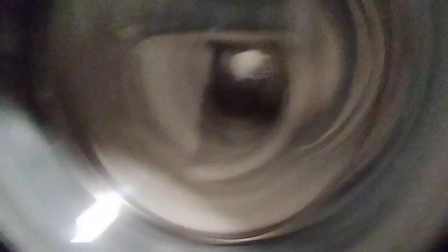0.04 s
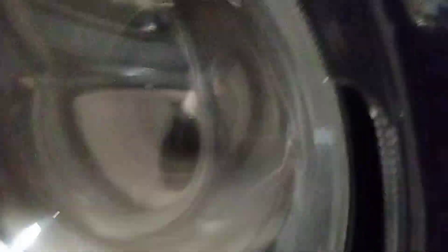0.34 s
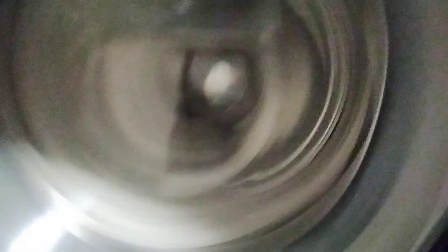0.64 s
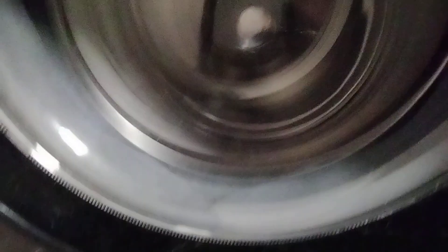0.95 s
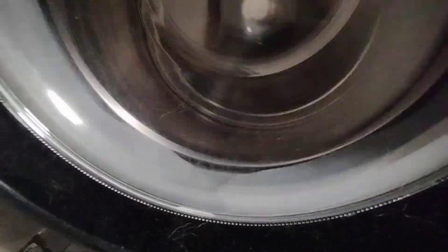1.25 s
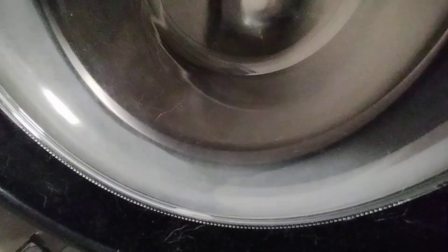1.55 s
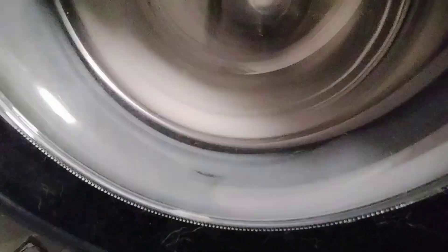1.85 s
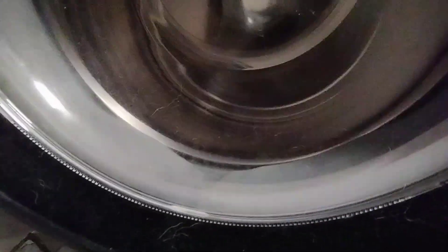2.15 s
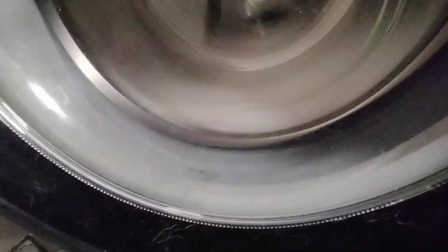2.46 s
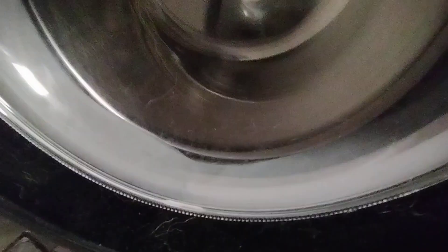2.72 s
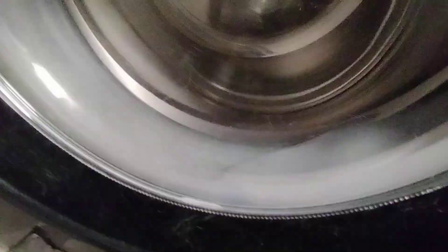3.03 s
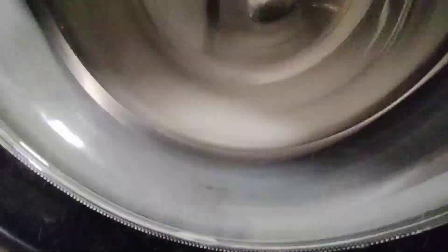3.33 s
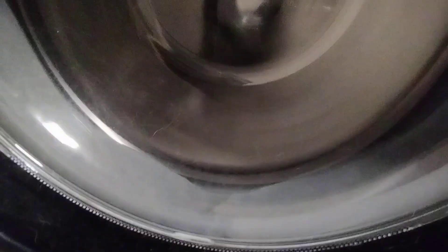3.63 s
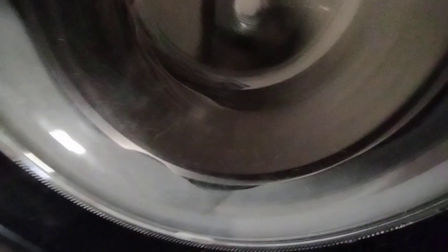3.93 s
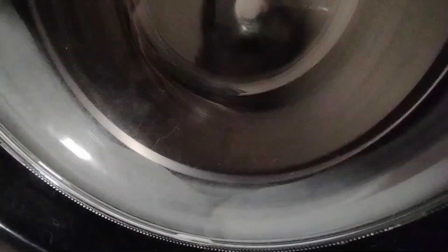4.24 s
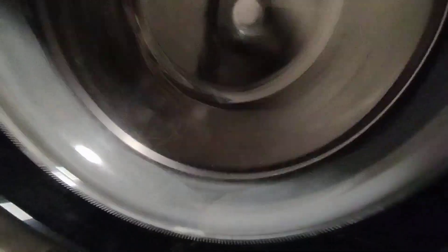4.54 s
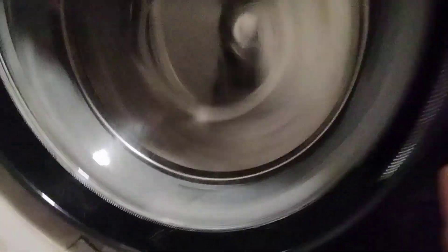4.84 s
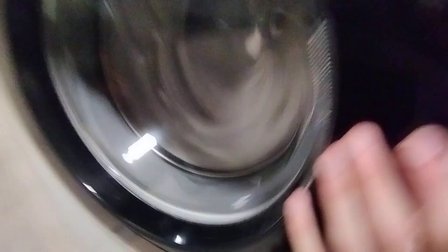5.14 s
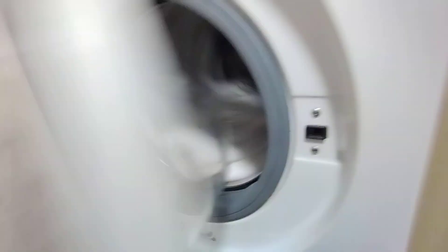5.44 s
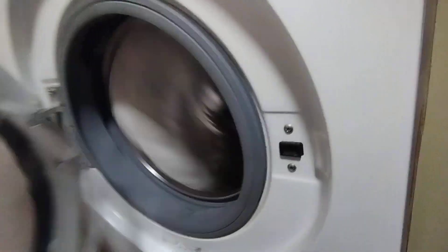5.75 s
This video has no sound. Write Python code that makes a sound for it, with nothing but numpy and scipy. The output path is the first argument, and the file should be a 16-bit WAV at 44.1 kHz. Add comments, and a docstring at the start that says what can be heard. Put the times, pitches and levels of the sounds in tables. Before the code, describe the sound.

Close up, a washing machine drum rumbles, clunks and squeaks ever more slowly, fading to a faint hum as the door opens.

```python
"""A washing machine slows down after its spin.

Heard right at the door glass, the drum rumbles in a pattern that repeats every turn and swells as
the heavy side of the load comes round. Air rushes, light rubbing whistles and dry scuffs sound
close by. As the drum slows, the tub around it swings wider: it thumps, knocks and squeaks on the
rubber seal. At the end a faint hum is left, and the door is pulled open."""
import sys
import numpy as np
from scipy import signal
from scipy.fft import rfft, irfft, next_fast_len
from scipy.io import wavfile
from scipy.ndimage import uniform_filter1d

SR = 44100
rng = np.random.default_rng(int(sys.argv[2]) if len(sys.argv) > 2 else 0)


def file_out(sig):
    """Save sig as 16-bit WAV at sys.argv[1]."""
    # one column per channel
    cols = np.atleast_2d(sig).T
    # limit, then scale
    lim = np.clip(cols, -1, 1)
    pcm = np.round(lim * 32767).astype(np.int16)
    wavfile.write(sys.argv[1], SR, pcm)


N = 259308
T = np.arange(N) / SR

# the drum's speed in turns per second is SPIN_HZ - SLOWING * t - LATE_SLOWING * t ** 2
SPIN_HZ, SLOWING, LATE_SLOWING = 6.8204, .6085, .039
# how far the drum has turned, in turns past the spot where it rubs the seal
ANGLE = .677 + SPIN_HZ * T - SLOWING * T ** 2 / 2 - LATE_SLOWING * T ** 3 / 3
TURN_COUNT = int(ANGLE[-1]) + 1
# tone colour of the grinding bearing and the shuddering cabinet: f/Hz, level/dB
GRIND_COLOUR = [(110, -10), (185, -4.5), (230, 3.5), (262, -0.5), (285, -3.5), (325, -9.5), (370, -4.5),
                (420, -9.5), (490, -14), (570, -20.5), (680, -34), (850, -22.5), (1250, -56), (2500, -40),
                (6000, -74)]


def undb(db):
    """Turn decibels into a gain to multiply by."""
    return 10 ** (np.asarray(db) / 20)


def curve(rows):
    """Join the rows of a time table with straight lines, one value per sample."""
    s, *columns = np.transpose(rows)
    return [np.interp(T, s, c) for c in columns]


def bell(t, peak, half_width):
    """A smooth hill that rises to 1 and falls again."""
    return np.exp(-((t - peak) / half_width) ** 2)


def unit(x):
    """Scale to an average strength (rms) of 1."""
    return x / np.sqrt(np.mean(x ** 2))


def even(x, span_s):
    """Hold the strength near 1 over any stretch of span_s."""
    return x / np.sqrt(uniform_filter1d(np.mean(x ** 2, axis=0), int(span_s * SR)) + 1e-12)


def colour(x, points, rate=SR):
    """Make some pitches louder and others softer, along (f/Hz, level/dB) points."""
    hz, db = np.transpose(points)
    size = x.shape[-1]
    padded = next_fast_len(size + size // 8)
    f = np.maximum(np.fft.rfftfreq(padded, 1 / rate), 1e-3)
    gain = undb(np.interp(np.log(f), np.log(hz), db))
    return irfft(rfft(x, padded) * gain, padded)[..., :size]


def stereo(mid, side):
    """Bass reaches left and right alike; treble is unrelated on the two sides."""
    # strength of the side signal against the middle: f/Hz, level/dB
    width = [(30, -30), (90, -21.5), (180, -15.5), (350, -8.5), (700, -4.5), (1200, 1.5), (16000, 0.5)]
    side = colour(side, width)
    return np.array([mid + side, mid - side])


def noise(points):
    """Stereo noise of strength 1 with the given tone colour."""
    return unit(colour(stereo(*rng.standard_normal((2, N))), points))


def wavering_tone(hz, width):
    """Noise squeezed into a narrow band round one pitch."""
    peak = [(-8, -70), (-1, -12), (0, 0), (1, -12), (8, -70)]  # distance/widths, level/dB
    return noise([(hz * np.exp(width * step), db) for step, db in peak])


def add(out, s, x):
    """Mix x into out from time s on."""
    i = max(int(s * SR), 0)
    out[..., i:i + x.shape[-1]] += x[..., :N - i]


def ring(t, modes, pitch=1):
    """The tones of a struck object; each fades by 60 dB in its time t60."""
    tones = sum(undb(db - 60 * t / t60) * np.sin(2 * np.pi * f * pitch * t) * rng.choice([-1, 1])
                for f, db, t60 in modes)
    return tones / np.sqrt(len(modes))


def room(x, wet_db, t60_s=0.3):
    """The direct sound plus the short echo of a small hard room."""
    t = T[:SR // 3]
    tail = rng.standard_normal((2, len(t))) * undb(-60 * t / t60_s) * (t > .004)
    tail = stereo(*tail / np.sqrt(np.sum(tail[0] ** 2)))
    return x + undb(wet_db) * signal.fftconvolve(np.atleast_2d(x), tail, axes=1)[:, :N]


def repeats(s, spread_s):
    """(time, gain) of a blow that returns every turn and is hardest at time s."""
    angles = np.interp(s, T, ANGLE) % 1 + np.arange(TURN_COUNT)
    times = np.interp(angles[(angles > ANGLE[0]) & (angles < ANGLE[-1])], ANGLE, T)
    gains = bell(times, s, max(spread_s, .001))
    return [(at, gain) for at, gain in zip(times, gains) if gain > .05]


def drum_bumps(memory, bump_colour=None, patchy_db=0, steps=2048):
    """Bumps met round the drum: each turn is much like the last, as the load shifts only slowly."""
    bumps = rng.standard_normal((TURN_COUNT, 2, steps))
    for k in range(1, TURN_COUNT):
        bumps[k] = memory * bumps[k - 1] + np.sqrt(1 - memory ** 2) * bumps[k]
    patches = np.repeat(bumps[:, :1, ::64], 64, axis=2)  # rough and smooth stretches
    path = np.concatenate(bumps * undb(patchy_db * patches), axis=1)
    if bump_colour is not None:
        path = colour(path, bump_colour, steps)
    return stereo(*(np.interp(ANGLE * steps, np.arange(len(p)), p) for p in path))


def rumble(wander_db=1.0, drift_rad=0.2):
    """The drum runs unevenly and makes low tones; each wanders slowly as the load shifts."""
    # tones at 3, 4, 5 ... times the turning speed: level/dB
    unevenness = [-10, -3, -1.5, -7.5, -0.5, -10, -2.5, -6, -3.5, -7.5, -7.5, -2.5, -9, -6.5, -5]
    out = np.zeros((2, N))
    turns = np.arange(0, TURN_COUNT + 4, 4)
    for k, db in enumerate(unevenness, 3):
        wander, drift = (np.interp(ANGLE, turns, w) for w in rng.standard_normal((2, len(turns))))
        phase = 2 * np.pi * (k * ANGLE + rng.random((2, 1))) + drift_rad * drift
        out += undb(db + wander_db * wander) * np.sin(phase)
    return stereo(*out)


def drum(heavy_side_turns=0.86, boom_lag_turns=0.026):
    """The rumble sinks with the speed; the cabinet booms and the bearing grinds as the load passes."""
    # loudness of the three parts: t/s, rumble/dB, boom/dB, grinding/dB
    levels = [(0, -24, -30.5, -30.5), (1.4, -27.5, -28, -31), (2.7, -23, -27, -30.5),
              (3.7, -23.5, -22, -28.5), (4.25, -27, -27.5, -32.5), (4.6, -40, -31.5, -39.5),
              (4.85, -35, -41, -45.5), (5.18, -45, -33, -46), (5.38, -60, -42.5, -51.5),
              (5.88, -53, -49, -56)]
    # how much the lopsided load swells the sound once a turn: t/s, depth/dB
    unbalance = [(0, 1), (1.6, 1.5), (2.5, 1.5), (3.4, 2.5), (5.88, -1)]
    # short bumps shake the cabinet less, so a slow drum sounds duller: bumps per turn, level/dB
    bump_colour = [(26, 7), (38, 1), (60, -15)]
    # tone colour of the cabinet panels: f/Hz, level/dB
    panel_colour = [(40, -11), (65, -4), (85, -6), (115, -0.5), (138, -4), (160, -1.5), (190, -11.5),
                    (300, -93), (900, -75)]
    rumble_db, boom_db, grind_db = curve(levels)
    depth_db, = curve(unbalance)
    load_turns = ANGLE - heavy_side_turns
    boom_db += depth_db * np.cos(2 * np.pi * (load_turns - boom_lag_turns))
    grind_db += depth_db * np.cos(2 * np.pi * load_turns) - 1
    # the grinding eases briefly while the load hangs on the far side
    grind_db -= 1.06 * depth_db * bell(ANGLE % 1, 0.32, 0.14)
    low_tones = even(rumble(), span_s=0.2)
    boom = even(colour(drum_bumps(memory=0.882, bump_colour=bump_colour), panel_colour), span_s=0.0776)
    grind = even(colour(drum_bumps(memory=.7, patchy_db=2.8), GRIND_COLOUR), span_s=0.0405)
    return undb(rumble_db) * low_tones + undb(boom_db) * boom + undb(grind_db) * grind


def air(rush_gain_db=2.5, hiss_gain_db=5):
    """Air rushes round the drum with a quick light flutter, under an even hiss."""
    # air stirred by the drum: t/s, rush/dB, hiss/dB
    levels = [(0, -51.5, -54), (2.5, -50.5, -55), (3.75, -46, -56), (4.35, -51.5, -56.5),
              (4.75, -59, -60.5), (5.25, -55.5, -60.5), (5.45, -62.5, -63), (5.88, -64, -60)]
    # tone colour of the rush: f/Hz, level/dB
    rush_colour = [(300, -2), (540, 2), (660, 6.5), (800, 11.5), (930, 10.5), (1100, 6.5), (1300, 8.5),
                   (1600, 4.5), (1850, 6), (2300, 3), (3000, -2.5), (4600, -4.5), (6500, -14), (9000, -47)]
    # tone colour of the hiss: f/Hz, level/dB
    hiss_colour = [(1500, 12), (4500, 14.5), (7000, 12), (9500, 11.5), (12500, 4.5), (15500, -7.5)]
    rush_db, hiss_db = curve(levels)
    flutter_db = 1.2 * unit(colour(rng.standard_normal(N), [(2, -20), (15, 0), (70, 0), (400, -70)]))
    rush = noise(rush_colour) * undb(rush_db + rush_gain_db + flutter_db)
    return rush + noise(hiss_colour) * undb(hiss_db + hiss_gain_db)


def whistles():
    """Light rubbing makes thin whistles that swell and fade, each on one high pitch."""
    # whistles: loudest t/s, half length/s, f/Hz, level/dB, width as a share of the pitch
    rubs = [(0.554, .14, 2186, -56, 0.014), (1.313, 0.12, 1778, -56, .006), (1.45, 0.044, 2168, -50, 0.005),
            (1.57, .07, 2160, -60, .008), (1.64, 0.016, 2380, -46.5, 0.04),
            (0.44, 0.63, 1230, -52.5, 0.064), (0.568, 0.92, 770, -56.5, 0.033),
            (5.099, 0.011, 2562, -45, 0.026)]
    return sum(wavering_tone(hz, width) * undb(db) * bell(T, s, half) for s, half, hz, db, width in rubs)


def clunks(rise_s=0.00613, detune=0.045):
    """The drum's heavy side hits the tub: dull, short blows, each at a slightly different pitch."""
    # blows about once a turn, with lighter rebounds: t/s, level/dB
    blows = [(.016, -20.5), (0.162, -22), (.317, -23.5), (0.473, -22), (0.62, -24), (0.777, -22.5),
             (0.936, -26), (1.062, -36), (1.161, -26), (1.266, -21), (1.434, -17.5), (1.607, -23),
             (1.746, -22), (1.792, -17.5), (1.924, -19.5), (1.967, -21), (2.034, -25.5), (2.11, -21.5),
             (2.154, -16), (2.219, -32), (2.331, -27.5), (2.366, -25), (2.542, -16.5), (2.746, -20),
             (3.171, -17), (3.278, -26), (3.373, -20.5), (3.414, -19), (3.588, -21), (3.798, -19),
             (3.86, -16), (4.147, -27), (4.407, -23)]
    # ringing tones of the tub: f/Hz, level/dB, t60/s
    tub_tones = [(210.6, 1.5, 0.044), (274.4, -4, 0.031), (351.2, -2, 0.057), (489, -9.5, 0.031)]
    out, t = np.zeros(N), T[:SR // 8]
    for s, db in blows:
        pitch = 1 + detune * rng.standard_normal()
        blow = sum(undb(tone_db - 60 * t / t60) * np.sin(2 * np.pi * hz * pitch * t)
                   for hz, tone_db, t60 in tub_tones)
        blow *= np.minimum(t / rise_s, 1) ** 2
        add(out, s - rise_s / 2, undb(db) * blow / np.abs(blow).max())
    return room(out, wet_db=-19)


def thumps(rise_s=0.00284, fall_s=0.015):
    """The load drops softly against the tub, turn after turn; the tub swings for a cycle or two."""
    # drops: hardest t/s, level/dB, f/Hz, time for the repeats to build or fade/s (0 = once)
    drops = [(0.745, -18, 74.6, 0.93), (1.471, -21, 157, 0.52), (1.976, -13.5, 112, 0.12),
             (2.808, -11, 71.5, 0.59), (2.952, -21, 66.5, 0.22), (3.288, -12.5, 82, 0.37),
             (3.778, -9.5, 84, 0.27), (3.878, -12, 73, 0.26), (4.14, -12.5, 89.5, 0), (4.396, -13.5, 82, 0),
             (4.564, -23, 75.5, 0), (4.679, -21, 69, 0), (4.716, -22.5, 72, 0), (4.834, -28, 59, 0),
             (4.956, -34.5, 62, 0), (5.002, -26, 66, 0), (5.11, -38, 60, 0), (5.191, -28, 55, 0),
             (5.241, -22, 103, 0), (5.5, -35, 73, 0), (5.7, -37.5, 74.6, 0)]
    out, t = np.zeros(N), T[:SR // 6]
    swing = np.minimum(t / rise_s, 1) * np.exp(-np.maximum(t - 2 * rise_s, 0) / fall_s)
    for s, db, hz, spread_s in drops:
        for at, gain in repeats(s, spread_s):
            add(out, at, gain * undb(db) * swing * np.sin(2 * np.pi * hz * t))
    return out


def scuffs(grain_db=3, gain_db=2, pan_db=1, tick_count=40, ticks_until_s=4.95):
    """Dry bursts of tiny slips, a little to the left, with faint ticks at random between them."""
    # the louder scuffs: t/s, level/dB, rise/s, fade/s, treble tilt/dB
    loud_scuffs = [(0.112, -42, .006, .005, -9), (.198, -48, 0.0037, 0.0057, 2),
                   (0.514, -44.5, 0.007, 0.01, 1), (0.784, -42.5, 0.0082, 0.015, 0),
                   (.985, -43.5, 0.0083, 0.012, 1.5), (1.113, -46, .008, .012, 3),
                   (1.339, -49.5, .004, 0.006, 9), (1.481, -45, .005, 0.0082, -3),
                   (1.853, -42, 0.018, 0.011, 0.5), (2.005, -53, .004, 0.014, 15),
                   (2.041, -54, 0.0036, 0.0066, 10), (2.096, -46, 0.0046, 0.0055, -9),
                   (2.182, -49.5, .004, 0.0082, 4.5), (2.413, -50, 0.0048, .006, 5.5),
                   (2.616, -40, 0.0049, 0.015, 5.5), (2.635, -43.5, .004, 0.01, 5),
                   (2.81, -31.5, 0.00074, 0.015, 0.5), (3.001, -43.5, .002, 0.011, 9.5),
                   (3.027, -39, 0.0035, 0.012, 1), (3.24, -38.5, .003, 0.017, 3.5),
                   (3.618, -42.5, 0.0071, 0.0039, 2), (3.697, -41, .004, 0.011, -4),
                   (3.732, -35, 0.0052, 0.031, 0.5), (3.797, -41, .004, 0.014, -0.5),
                   (3.942, -37, 0.0036, 0.023, -1.5), (3.97, -43, 0.0036, .01, 5),
                   (4.023, -44, .003, 0.0081, 3), (4.062, -46, 0.0053, 0.0068, 1),
                   (4.218, -33.5, 0.0027, 0.016, 2.5), (4.232, -40, .004, 0.041, -2),
                   (4.309, -36, 0.014, 0.01, 3.5), (4.326, -38, .004, 0.028, -2),
                   (4.801, -49, .006, 0.0045, 4), (4.911, -52, .007, 0.0061, 4),
                   (4.981, -47, 0.017, 0.028, -3), (5.161, -44.5, 0.0049, 0.033, -2),
                   (5.227, -47, .005, 0.0097, -3), (5.422, -49, .003, 0.0028, -6)]
    # tone colour of a scuff: f/Hz, level/dB
    scuff_colour = [(700, -6), (1700, 14.5), (3800, 13), (6000, 11.5), (9500, 4.5), (13000, -2.5),
                    (15500, -10.5)]
    out, t = np.zeros((2, N)), T[:SR // 8]
    ticks = [(s, -46, 0.0026, 0.0026, 0) for s in rng.random(tick_count) * ticks_until_s]
    for s, db, rise, fade, tilt_db in loud_scuffs + ticks:
        grains = np.repeat(rng.standard_normal(len(t)), 32)[:len(t)]
        slips = colour(rng.standard_normal((2, len(t))) * undb(grain_db * grains), scuff_colour)
        slips = unit(colour(slips, [(3000, -tilt_db), (13000, tilt_db)]))
        shape = np.minimum(t / rise, 1) * np.exp(-np.maximum(t - rise, 0) / fade)
        add(out, s, slips * shape * undb(db + gain_db + np.array([[pan_db], [-pan_db]]) / 2))
    return out


def knocks(thud_db=-1, thud_rise_s=0.0041, crack_db=-7, crack_s=0.002):
    """Plastic and metal meet: a crack and a short ring over a hollow thud."""
    # knocks of the tub and door: t/s, level/dB, ring f/Hz, extra thud/dB
    hits = [(0.571, -30, 830, -5), (.934, -37.5, 810, 0), (1.784, -31.5, 770, 9), (1.816, -32, 787, 4),
            (1.96, -31.5, 810, 16), (2.182, -27, 1000, -10), (2.287, -30, 900, 10.5),
            (2.486, -32, 950, -12), (3.53, -23, 1337, 5), (3.772, -19.5, 1304, 2.5),
            (3.778, -22, 1320, 9.5), (4.026, -18, 1326, 4.5), (4.228, -32.5, 920, 18.5),
            (4.49, -26.5, 890, -5), (4.549, -36.5, 850, 11.5), (4.648, -36.5, 720, 15), (4.78, -41, 850, 2),
            (4.822, -32.5, 874, -15), (4.832, -37, 860, -5), (5.013, -30, 820, -6), (5.094, -36, 1310, -16),
            (5.185, -36, 840, -5), (5.205, -34, 910, 1), (5.238, -29, 1115, -4)]
    # tones of the ring: multiple of its pitch, level/dB, t60/s
    ring_tones = [(.6, -10, .04), (.9, -2, 0.029), (1.04, -2.5, 0.021), (1.17, -12, 0.088),
                  (1.3, -11.5, 0.04), (2.2, -35, 0.03)]
    # tones of the hollow body: f/Hz, level/dB, t60/s
    body_tones = [(163, 10.5, 0.021), (255, 3, 0.053), (303, -21.5, 0.67), (443, 4, 0.038),
                  (475, -4, 0.031)]
    out, t = np.zeros(N), T[:SR // 6]
    for s, db, hz, body_db in hits:
        crack_colour = [(hz / 4, -12), (hz, 0), (hz * 1.4, -3), (hz * 3, -30)]
        crack = unit(colour(rng.standard_normal(len(t)), crack_colour)) * np.exp(-t / crack_s)
        thud = undb(body_db + thud_db) * np.minimum(t / thud_rise_s, 1) * ring(t, body_tones)
        add(out, s, undb(db) * (undb(crack_db) * crack + ring(t, ring_tones, hz) + thud))
    return room(out, wet_db=-7.5)


def squeaks(touch_s=.006, lead_s=0.025, grip_s=0.011, release_s=0.0063):
    """The rubber seal sticks and slips on the drum: a falling chirp, a lower held tone, a quick stop."""
    # squeaks: grip t/s, hold/s, tone level/dB, tone f/Hz, chirp level/dB, chirp f/Hz, overtones/dB
    grips = [(2.181, 0.004, -46, 905, -46, 1160, -52), (2.372, 0.0048, -37.5, 863, -43, 1193, -53),
             (2.572, 0.0098, -36.5, 1034, -43, 1066, -49), (2.772, 0.011, -30.5, 1030, -43, 1088, -48.5),
             (2.987, 0.0044, -20, 821, -33, 1090, -47), (3.206, 0.0053, -20, 838, -32.5, 1103, -47.5),
             (3.427, 0.022, -25.5, 849, -39, 1091, -47.5), (3.667, 0.025, -26.5, 829, -37.5, 1057, -48.5),
             (3.927, 0.013, -24, 842, -40.5, 1214, -47.5), (4.206, 0.003, -28, 890, -38, 1152, -50)]
    # rasp of the friction: f/Hz, level/dB
    rasp_colour = [(500, -26), (950, 18), (1350, -23), (1600, 5), (2100, 15), (2500, 3), (2900, 9),
                   (4000, -11), (9000, -40)]
    # scraping close to the tone's pitch: f/Hz, level/dB
    scrape_colour = [(640, -40), (780, -1), (920, 5), (1100, -12), (1350, -39)]
    jitter, flutter_db, pan_db, left_lag_s = .04, 3.2, 3, 0.00024
    tones, overtones = np.zeros((2, N))
    t = T[:SR // 10]
    for s, hold_s, db, hz, chirp_db, chirp_hz, overtone_db in grips:
        unsteady = uniform_filter1d(rng.standard_normal((2, len(t))), size=100)
        wobble, flutter = (unit(w - w.mean()) for w in unsteady)
        grip = np.clip((t - lead_s) / grip_s + .5, 0, 1)
        pitch = chirp_hz + (hz - chirp_hz) * np.minimum(t / (lead_s + grip_s / 4), 1) ** 2.5
        phase = 2 * np.pi * np.cumsum(pitch * (1 + jitter * wobble)) / SR
        release = np.exp(-(np.maximum(t - lead_s - hold_s, 0) / release_s) ** 2)
        contact = np.minimum(t / touch_s, 1) * release * undb(flutter_db * flutter)
        upper_tones = np.sin(2 * phase) + undb(-7) * np.sin(3 * phase)
        rasp = undb(-5) * unit(colour(rng.standard_normal(len(t)), rasp_colour))
        scrape = undb(-10) * unit(colour(rng.standard_normal(len(t)), scrape_colour))
        tone_db = chirp_db + (db - chirp_db) * grip
        add(tones, s - lead_s, contact * undb(tone_db) * (np.sin(phase) + scrape))
        add(overtones, s - lead_s, contact * undb(overtone_db) * (upper_tones + rasp))
    # the ringing part of the seal lies to the right, so the left side hears it later and duller
    heard = np.array([np.interp(T - left_lag_s, T, tones), tones])
    heard += overtones * undb(np.array([[-pan_db], [pan_db]]) / 2)
    return room(heard, wet_db=-14)


def seal_ticks(loudest_s=4, half_length_s=0.67, level_db=-47.5):
    """The drum's rim grazes the seal with a tiny tick once a turn, most while it swings widest."""
    # tone colour of the dry touch: f/Hz, level/dB
    touch_colour = [(1300, -42), (2150, -4), (2800, 8), (4500, 6.5), (7500, 2)]
    touch = bell((ANGLE + .5) % 1, 0.52, half_width=.001)
    return noise(touch_colour) * undb(level_db) * bell(T, loudest_s, half_length_s) * touch


def slow_roll(hiss_db=-3):
    """A soft brushing, then a faint wavering hum and hiss as the drum rolls on."""
    # loudness of the brushing: t/s, level/dB
    brush_levels = [(4.42, -69), (4.48, -48), (4.6, -47), (4.67, -53), (4.85, -79), (4.95, -84)]
    # its tone colour: f/Hz, level/dB
    brush_colour = [(1000, -5), (2200, 4), (4500, 0), (5600, -34)]
    # loudness of the hum and its hiss: t/s, level/dB
    hum_levels = [(4.9, -63), (5.2, -61), (5.38, -57), (5.62, -54.5), (5.88, -63)]
    # tones of the hum: f/Hz, level/dB
    hum_tones = [(320, -12), (500, 5), (570, 4.5), (930, -9)]
    # tone colour of the hiss: f/Hz, level/dB
    hiss_colour = [(1700, -23), (2300, 8), (2900, -10), (4100, 3), (4600, 9), (5100, -1), (6000, -5),
                   (9000, -35)]
    hum = unit(sum(undb(db) * wavering_tone(hz, width=0.055) for hz, db in hum_tones))
    rolling = (hum + undb(hiss_db) * noise(hiss_colour)) * undb(curve(hum_levels)[0])
    return noise(brush_colour) * undb(curve(brush_levels)[0]) + rolling


def door(loudest_s=5.255, half_length_s=0.046, level_db=-35):
    """The cabinet shudders briefly as the door is pulled off its seal."""
    return noise(GRIND_COLOUR) * undb(level_db) * bell(T, loudest_s, half_length_s)


def scene():
    """All the sounds of the machine and its door, added together."""
    return (drum() + air() + whistles() + clunks() + thumps() + scuffs() + knocks()
            + squeaks() + seal_ticks() + slow_roll() + door())


def record(dry, top_hz=15800):
    """Each of the microphone's two openings colours the sound; the highest treble is cut steeply."""
    # tone colour of the openings: f/Hz, left level/dB, right level/dB
    openings = [(15.1, -12, -4.5), (32, 0, -0.5), (312, 0.06, -0.6), (800, 0, 2), (1510, -5, -1),
                (3800, -7, 0), (7160, -8, 0.5), (8070, -19.5, -5), (9940, -2, 0.5), (11100, -10, -6),
                (12120, 4.5, -0.5), (15600, 15, 15)]
    hz, *sides_db = np.transpose(openings)
    heard = np.array([colour(x, np.transpose([hz, db])) for x, db in zip(dry, sides_db)])
    return signal.sosfilt(signal.ellip(10, .2, 70, top_hz, fs=SR, output="sos"), heard)


dry = scene()
out = record(dry)
file_out(out)
```